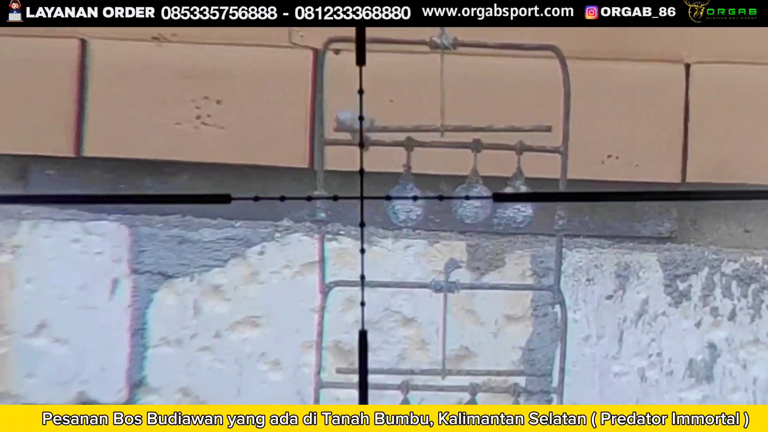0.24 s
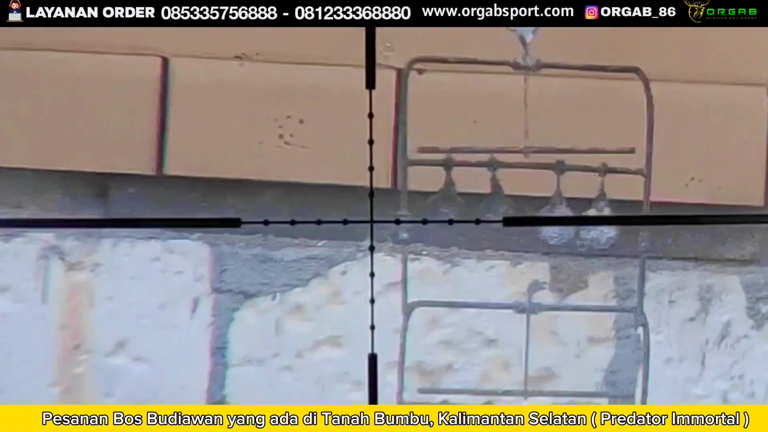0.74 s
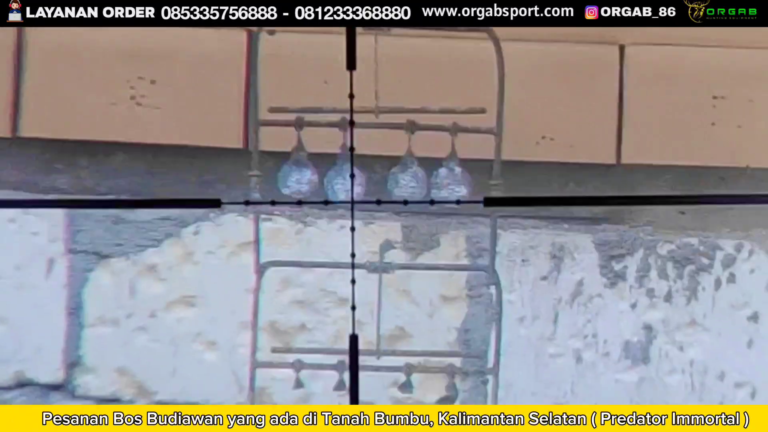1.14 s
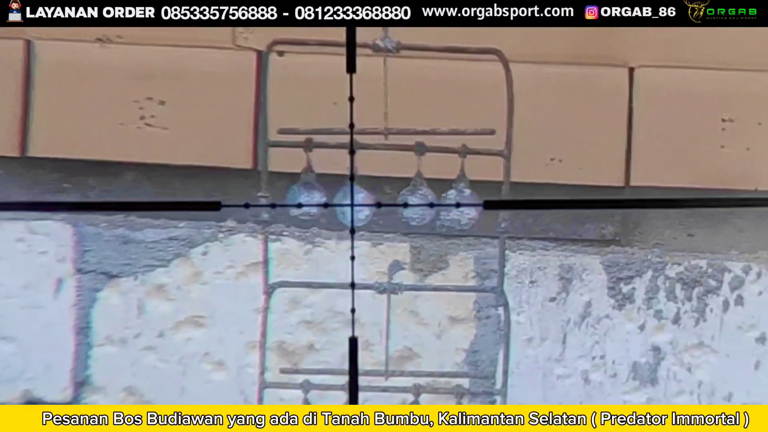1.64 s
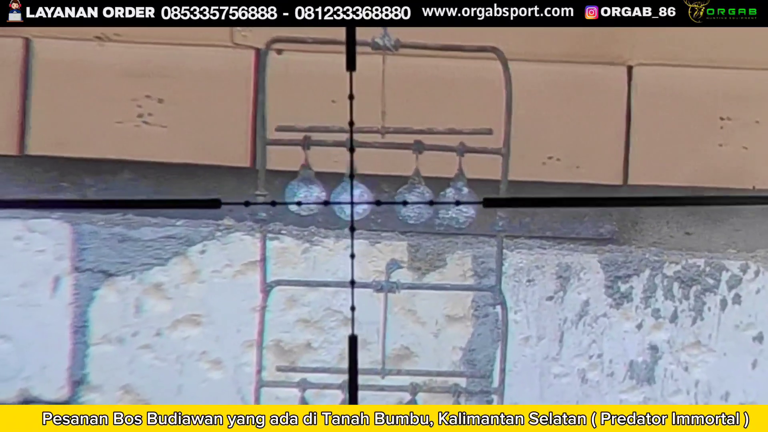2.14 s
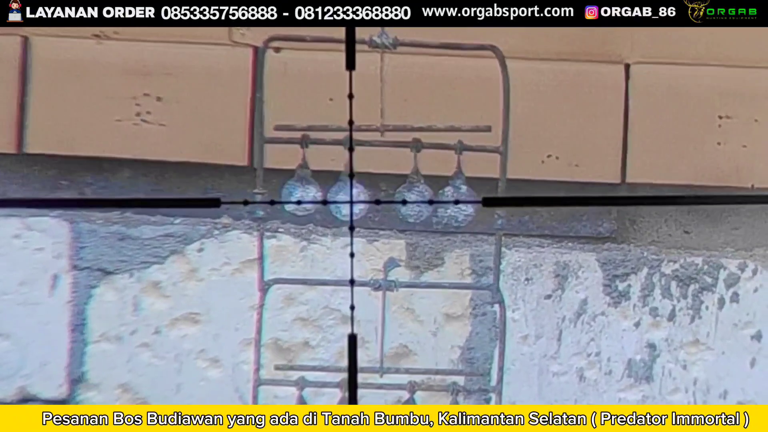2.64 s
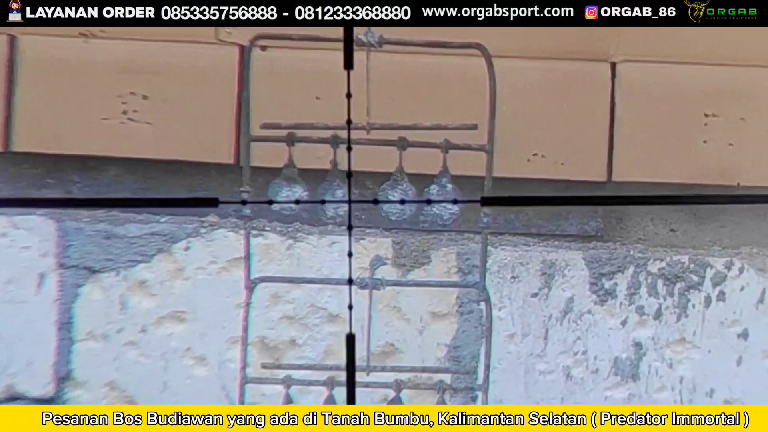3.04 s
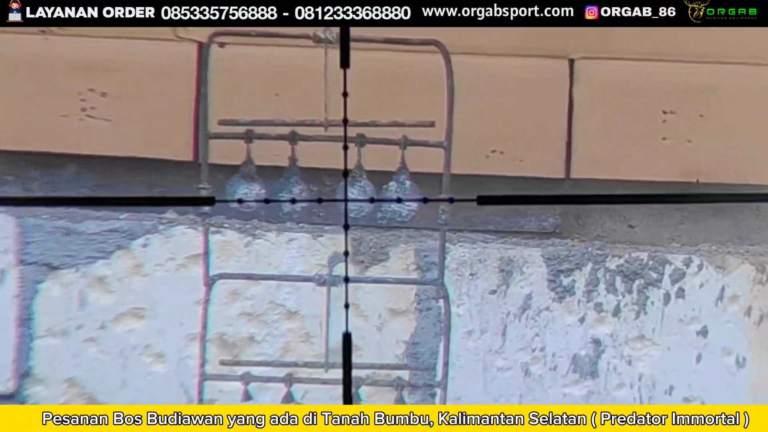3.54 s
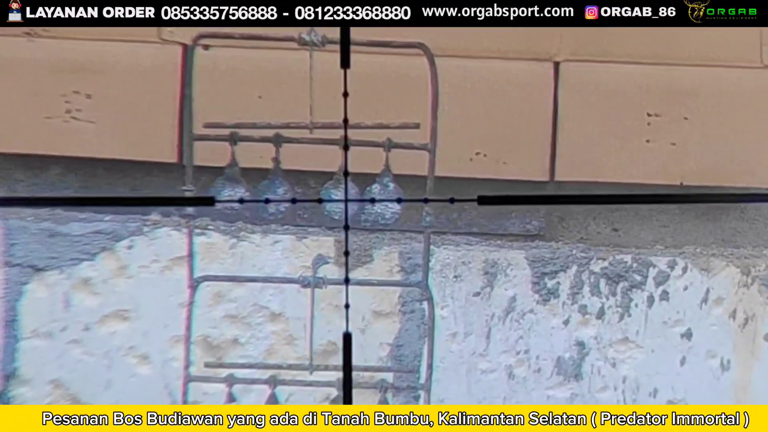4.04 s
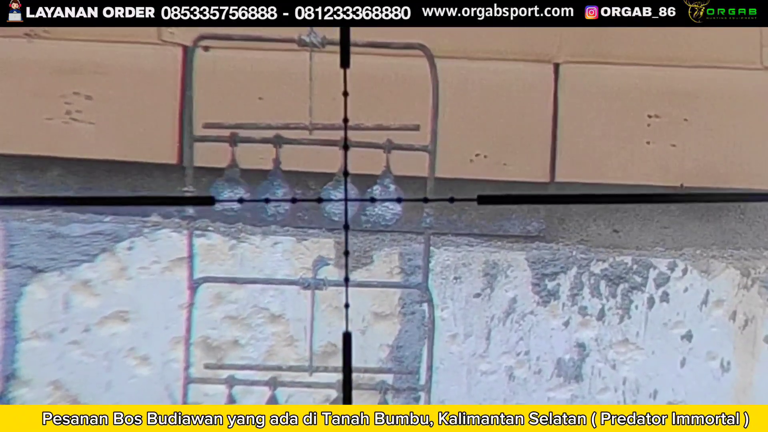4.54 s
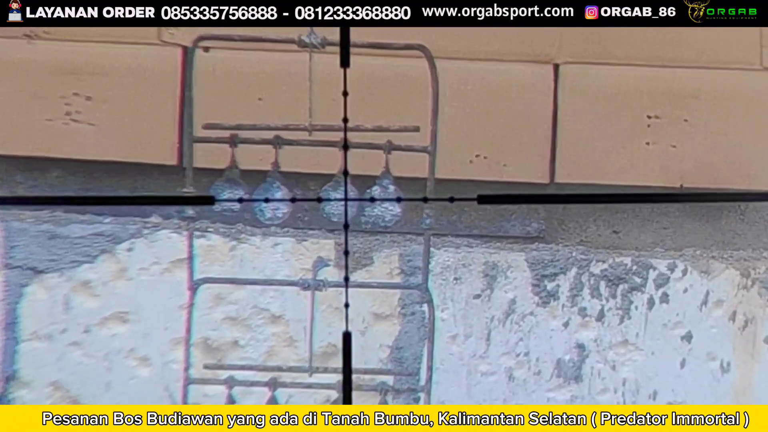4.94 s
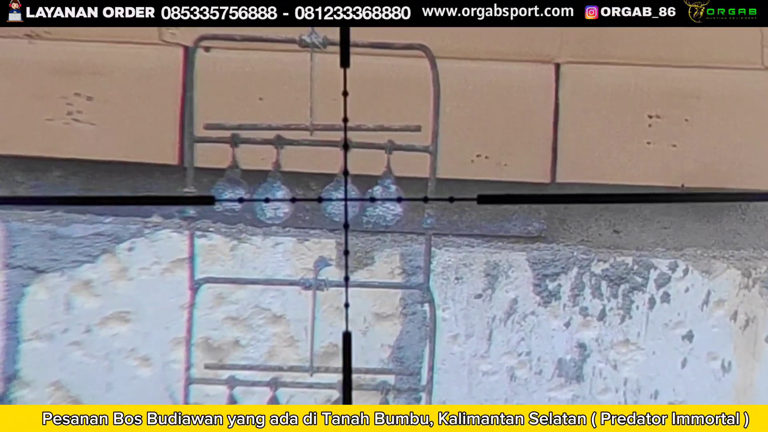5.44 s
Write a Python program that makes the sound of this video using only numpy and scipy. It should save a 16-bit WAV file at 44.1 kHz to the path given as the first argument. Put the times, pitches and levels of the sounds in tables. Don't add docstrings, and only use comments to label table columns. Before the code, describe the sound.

The sound opens in the tail of an air rifle blast: strong bright hiss and a slow pressure bump on the left, holding until about 0.2 seconds and fading dull by 0.5, with a struck steel target ringing to the right. A hard snap cracks at 0.08. From 0.47 to 1.3 seconds the bolt is worked close by: tight clusters of steel clacks around 0.6, 0.74, 0.84, 0.87, 0.98 and 1.1, with woody knocks, springy ringing and brief scrapes, ending in a sharp snap at 1.29 and a little air hiss. Loud clacks overload and duck the background. From 1.5 seconds to the end at about 5.7, a piston compressor chugs nearly seven strokes a second, thumping, puffing, slapping and clanking increasingly brightly over rumble and motor whine, strongest near 4. Small grip creaks at 2, 2.2 and 3.3 to 3.5, soft leaf rustles, and faint belt squeaks from 3.7 to 4.8. Short yard reverberation.

```python
import sys
import numpy as np
from scipy import signal
from scipy.fft import rfft, irfft, next_fast_len
from scipy.io import wavfile
from scipy.ndimage import uniform_filter1d, map_coordinates

SR = 44100
rng = np.random.default_rng(int(sys.argv[2]) if len(sys.argv) > 2 else 0)


def pcm_store(signal):
    levels = np.round(np.clip(np.atleast_2d(signal), -1, 1) * 32767)
    wavfile.write(sys.argv[1], SR, levels.astype(np.int16).T)


def elevation(decibels):
    levels = np.asarray(decibels, float)
    return 10 ** (levels / 20)


N = 250929
T = np.arange(N) / SR
TOP_HZ = 14350
PORT_LAG_S = 18 / SR

# time_s, pressure
PORT_SWAY = [(0, -0.1), (.03, -0.75), (.16, -0.93), (.24, -1.16), (.36, 0.15), (.46, 0.9), (.58, 0.58),
             (.82, 0.053), (1.2, -0.029)]
# freq_hz, level_db_per_hz
AIR_SPECTRUM = [(530, -15), (900, -10), (1290, -12), (1950, -2), (2120, -6), (2770, -3), (7740, -1.5),
                (11200, -9), (14300, -18.5)]
# time_s, left_minus_right_db
RIFLE_PAN = [(0, -3.5), (.25, 1), (.6, 7.5), (.74, 7), (.88, 1.5), (1.0, 5), (1.1, 10.5), (1.22, 9.5),
             (1.29, -9.5)]
# freq_hz, level_db, t60_s
TARGET_MODES = [(229, -2.5, 1.2), (731, 6.5, 1.13), (2003, -27, 1.3), (2470, -2.5, 1.4), (2886, 3.5, 1.17),
                (4011, 2, 0.92), (5030, 6, .3), (5440, -2, .3), (7250, -1, .3), (6980, -5, 0.63),
                (3580, -10, 0.67), (7670, 18, 0.071), (7670, 10, .6)]
# freq_hz, level_db_per_hz
RUMBLE_SPECTRUM = [(12, -3), (22, 0), (32, 2), (48, -3.5), (75, 0.5), (130, -10.5), (211, -14.5),
                   (400, -23), (600, -42)]
# freq_hz, level_db_per_hz
MOTOR_SPECTRUM = [(120, -3.5), (200, -7), (276, -4.5), (369, -8), (459, -2), (614, -5), (978, 1),
                  (1120, -3), (2210, -5), (3140, -13), (3420, -9), (4450, -14), (5070, -6), (5960, -13.5),
                  (6700, -12.5), (8450, -20), (14300, -120)]
# freq_hz, level_db_per_hz
RUSTLE_SPECTRUM = [(1760, -67), (3000, -13), (4430, -11.5), (5050, -2.5), (6000, -11), (12600, -14.5),
                   (14400, -37), (14900, -49), (15400, -77)]
# center_s, half_length_s, height_db
CAMERA_JOLTS = [
    (0, 0.047, 8),
    (.07, 0.023, 7.5),
    (.52, 0.12, 0.5),
    (.87, 0.07, 13.5),
    (1.17, 0.085, 7.5),
    (1.36, 0.11, -1.5),
]
# center_s, half_length_s, height_db
LEAF_GUSTS = [
    (2.45, 0.1, 3.5),
    (3.36, 0.26, 2.5),
    (4.74, 0.13, 5.5),
]
# time_s, load_db
MOTOR_LOAD = [(0, 0), (1.5, -8.5), (2.4, -0.5), (2.75, 1.5), (3.15, 3.5), (3.5, 2.5), (3.9, 7.5), (4.24, 6),
              (4.36, -5), (5.69, -4)]
# freq_hz, width_hz, level_db, growth_db_per_db_load
MOTOR_TONES = [(792, 83, -51, 0.36), (989, 52, -45, 0.45), (1409.5, 32, -47.5, 1.26),
               (5100, 110, -56.5, -0.06)]
# start_s, level_db, decay_ms
LEVER_SNAPS = [
    (.0788, 16, 0.56),
    (0.0808, 5, 1.2),
    (1.2922, -27, 0.73),
    (1.2919, 9, 1.03),
    (1.2945, 5.5, 1),
]
# freq_hz, width_hz, level_db
TUBE_MODES = [(2590, 280, -6), (4200, 290, -2), (5710, 300, -3), (6920, 220, -2.5), (8200, 820, -7),
              (10150, 1040, -2.5), (10580, 320, 1), (13960, 970, -9.5)]
# center_s, half_length_s, level_db
TUBE_REFILLS = [
    (0.054, .008, -40),
    (0.136, 0.037, -21.5),
    (1.3, 0.016, -32),
    (1.357, 0.048, -32.5),
    (1.425, 0.032, -37.5),
]
# peak_s, peak_db, brightness_db, length_ms
BOLT_CONTACTS = [(0.08, -13, 5.5, 1), (0.465, -20, 1, 1.5), (0.4713, -9, 15, 1.2), (0.49, -16, 15, 1),
                 (.485, -18.5, 6, 21), (0.587, -23, -12, 3.4), (0.5916, -11, 18, .8), (.5962, 6, 8.5, 1.52),
                 (.6015, 8.5, 4, 1.2), (.605, 3, -3.5, 2.7), (.738, -1, -4, 2.3), (0.7416, 7, 3.5, 2.2),
                 (0.748, -4, 0, 6), (0.8306, -0.5, 15, 1.5), (.834, 3.5, 17, 2.5), (.837, 3, 11, 2.8),
                 (.772, -9, 14, 5.7), (.846, -1.5, 12, 5.4), (0.863, 1, 12, 1.7), (.8675, 8, 8, 2.5),
                 (.872, 6, 6, 3.3), (0.9758, 2, 11, 4), (1.011, -7.5, -1, 5.2), (1.045, -14, 8, 2),
                 (1.0513, -1, 8, 1.4), (1.0698, -7, 19, .9), (1.092, -16, 7, 4.5),
                 (1.0993, -0.5, -4.5, 1.85), (1.1155, -11, 5, 1), (1.1265, -2, 17, .9),
                 (1.132, -10.5, 10, 2.8), (1.137, -2, -2.5, 2.3), (1.2107, -9.5, -3, 1.5),
                 (1.216, -17, -3, 4), (1.295, -10, -7, 2.2)]
# freq_hz, level_db_per_hz
CLACK_SPECTRUM = [(590, -16), (1000, -8), (3610, 2), (4330, 5.5), (5450, 1), (6470, 4), (7420, 2),
                  (10600, 2.5), (13600, -5.5), (15400, -16.5)]
# freq_hz, width_hz, level_db
STOCK_MODES = [(180, 70, -1), (308, 41, -2.5), (820, 71, -4), (1570, 130, -3), (2420, 490, -8.5)]
# freq_hz, level_db, t60_s
SPRING_MODES = [(6500, -15, 0.081), (10900, 9.5, 0.079), (12400, 2.5, 0.066), (12800, -11, 0.16),
                (12840, 1, 0.054), (13300, -22, 0.3), (13000, 1.5, 0.055), (14300, -21, 0.073)]
# start_s, level_db
SPRING_PLUCKS = [
    (0.47, -25),
    (0.477, -23),
    (0.497, -34),
    (.597, -17),
    (0.739, -39),
    (0.866, -12),
]
# time_s, level_db
BOLT_DRAW = [(.67, -58), (.69, -27), (.713, -27), (.717, -20), (.724, -21), (.728, -19), (.734, -18),
             (.742, -40)]
# start_s, piston_db, valve_db
STROKES = [(1.5078, -22, -36), (1.654, -30, -28.5), (1.8012, -16, -37), (1.9488, -28, -31),
           (2.0977, -17.5, -36), (2.2455, -29, -21.5), (2.39, -12.5, -26.5), (2.5347, -54, -32),
           (2.6772, -22, -25.5), (2.8193, -28.5, -26.5), (2.9629, -23, -22), (3.108, -27.5, -32),
           (3.2518, -17.5, -25), (3.3994, -23.5, -35), (3.547, -20.5, -24), (3.6935, -26, -21),
           (3.8371, -28, -23.5), (3.9809, -26, -17), (4.125, -22.5, -20.5), (4.264, -23.5, -20.5),
           (4.405, -33, -20.5), (4.556, -16.5, -25), (4.705, -51, -27), (4.8581, -16, -24.5),
           (5.0121, -25, -21.5), (5.1599, -15, -22), (5.3073, -35.5, -19), (5.4543, -16.5, -23),
           (5.605, -23.5, -18)]
# lag_s, level_db
FRAME_ROCKS = [
    (-.0025, 0.5),
    (.034, -7.5),
    (.069, -7),
    (.104, -10.5),
]
# start_s, peak_db, t60_s
HAND_CREAKS = [(0.3794, -32, 0.042), (0.7683, -10, 0.069), (1.99, -12.5, 0.024), (2.195, -16.5, 0.23),
               (3.2934, -18, 0.045), (3.364, -17, 0.43), (3.472, -18, 0.3), (4.4443, -24, 0.071),
               (4.7314, -28, 0.05)]
# start_s, freq_hz, level_db, t60_s
KNOCKS_AND_PINGS = [(0.351, 268, -31, .05), (.378, 405, -27.5, 0.13), (.398, 287, -29.5, 0.14),
                    (0.461, 180, -29, .07), (.498, 10950, -26, 0.15), (.603, 837, -0.5, 0.035),
                    (.603, 2530, -10, .03), (.660, 10990, -38, .1), (.835, 2770, -8.5, 0.064),
                    (.868, 301, -13.5, 0.13), (.869, 855, -3, 0.028), (0.871, 178, -14, 0.12),
                    (.977, 807, -18, 0.061), (1.012, 7570, -20, .12), (1.013, 820, -29, .07),
                    (1.045, 7700, -16, .04), (1.068, 824, -23.5, 0.058), (1.070, 289, -32, 0.081),
                    (1.101, 853, -12.5, 0.043), (1.138, 837, -9.5, 0.063), (1.141, 298, -27.5, 0.24),
                    (1.170, 880, -19.5, .07), (1.195, 870, -15.5, 0.035), (1.208, 4440, -18, 0.03),
                    (1.509, 3540, -15, 0.051), (2.090, 494, -38.5, .98), (2.212, 2050, -24.5, 0.13),
                    (2.679, 3650, -30, .08), (3.254, 3520, -19.5, 0.09), (3.255, 4900, -23, 0.027),
                    (3.400, 3510, -20, 0.083), (3.401, 2250, -21.5, 0.059), (3.478, 757, -20.5, 0.14),
                    (3.479, 5140, -27, 0.067), (3.548, 3530, -20.5, 0.095), (3.549, 2330, -28, 0.054),
                    (4.861, 2334, -14, 0.029), (5.200, 3500, -33, .08), (5.16, 5430, -25, .06)]
# start_s, length_s, level_db, brightness_db
STEEL_SLIDES = [
    (0.711, 0.093, -27, 4),
    (0.9, 0.13, -28.5, 6),
    (1.073, 0.13, -27.5, -0.5),
    (1.324, 0.056, -37.5, 5),
    (1.413, 0.052, -55, -3),
]
# freq_hz, width_hz, level_db
VALVE_PLATES = [
    [(1037, 99, -1.5), (1443, 210, 1.5), (1730, 90, 5)],
    [(2023, 130, -2.5), (2397, 183, -2.5)],
]
# start_s, valve_db
PLATE_REBOUNDS = [
    (3.476, -21),
    (3.874, -21.5),
    (4.4528, -31),
    (4.764, -31),
]
UPPER_SEATING_DB = [-4, 3, -5, 0, 0, -2, -2, -1, -6, -2, -0.5, 6, 6, 0, 0, 0.5, -2.5, -4, 1, -4, -0.5, 6, 1,
                    -1, -6, -4, -3.5, 0, -5, -2.5, 4, 3, 8]
# freq_hz, width_hz, level_db
HEAD_MODES = [(2246, 156, 6.5), (3530, 100, 6), (5040, 330, -8.5), (5280, 79, -4), (8050, 280, -15),
              (9500, 400, -11.5)]
# center_s, half_length_s, high_db, low_db
BELT_SQUEAKS = [
    (3.674, .025, -52, -55),
    (3.779, 0.014, -42, -54),
    (4.452, 0.02, -53, -41),
    (4.746, .015, -52, -41),
    (4.798, .02, -50, -39.5),
]
# freq_hz, t60_s
WALL_DECAY = [(200, 0.13), (2000, 0.27), (12000, 0.39)]
# freq_hz, left_minus_right_db
PORT_COLOUR = [(60, -1), (110, 1.5), (200, -1.5), (380, -1.5), (700, -1.5), (1290, 0), (2380, -2.5),
               (4400, -5), (8120, -0.5), (15000, 17.5)]
# freq_hz, coherence
PORT_LIKENESS = [(60, 1), (300, 0.84), (1500, 0.44), (5000, 0.032), (12000, 0.052)]
# start_s, drop_db
GAIN_DUCKS = [(0.079, 18), (0.473, 4), (0.5959, 18), (0.603, 9), (0.742, 18), (0.838, 15.5), (0.870, 13.5),
              (0.981, 10.5), (1.098, 3.5), (1.138, 10.5), (1.2936, 14)]


def unit(x):
    return x / np.sqrt(np.mean(x ** 2) + 1e-20)


def along(points, hz):
    f, v = np.transpose(points)
    return np.interp(np.log(hz + 1), np.log(f + 1), v)


def curves(rows):
    s, *cols = np.transpose(rows)
    return [np.interp(T, s, c) for c in cols]


def humps(rows):
    out = np.zeros(N)
    for s, half_s, height in rows:
        near = slice(max(round((s - 4 * half_s) * SR), 0), round((s + 4 * half_s) * SR))
        out[near] += height * np.exp(-((T[near] - s) / half_s) ** 2)
    return out


def wander(size, rate_hz):
    return map_coordinates(rng.standard_normal(size), [T * rate_hz])


def filtered(x, response):
    m = next_fast_len(x.shape[-1] + 4096)
    return irfft(rfft(x, m) * response(np.fft.rfftfreq(m, 1 / SR)), m)[..., :x.shape[-1]]


def body(modes):
    def response(f):
        total = 0
        for k, (c, w, db) in enumerate(modes):
            total = total + (-1) ** k * elevation(db) * 1j * f * w / (c * c - f * f + 1j * f * w)
        return total
    return response


def tone(hz, width_hz):
    return unit(filtered(rng.standard_normal(N), lambda f: body([(hz, width_hz, 0)])(f) ** 2))


def rush(spectrum, alike=PORT_LIKENESS):
    hz = np.fft.rfftfreq(next_fast_len(N), 1 / SR)
    turn = np.arccos(np.clip(along(alike, hz), -1, 1)) / 2
    z = rng.standard_normal((2, len(hz))) + 1j * rng.standard_normal((2, len(hz)))
    z = z * elevation(along(spectrum, hz)) * (hz < TOP_HZ)
    mid, side = irfft(z * [np.cos(turn), np.sin(turn)])[:, :N]
    return unit(np.array([mid + side, mid - side]))


def patchy(x, depth_db):
    z = signal.stft(x, nperseg=512)[2]
    field = uniform_filter1d(rng.standard_normal(z.shape[1:]), size=4, axis=0)
    field = uniform_filter1d(field, size=12, axis=1)
    y = signal.istft(z * elevation(depth_db * unit(field)), nperseg=512)[1][:, :N]
    return unit(filtered(y, lambda hz: hz < TOP_HZ))


def struck(times_s, levels_db, t60_s, rise_s):
    env, t = np.zeros(N + SR), T[:SR // 5]
    for s, db, t60 in np.broadcast(times_s, levels_db, t60_s):
        env[round(s * SR):][:len(t)] += elevation(db - 60 * t / t60) * (1 - np.exp(-t / rise_s))
    return env[:N]


def ringing(modes, s, db, rough, seconds):
    t, out = T[:round(seconds * SR)], np.zeros(N)
    x = np.zeros(len(t))
    for hz, level_db, t60_s in modes:
        strength = elevation(db + level_db + rng.normal(0, 1.0) - 60 * t / t60_s)
        drift = rough * np.cumsum(rng.standard_normal(len(t)))
        x += strength * np.sin(2 * np.pi * hz * t + drift)
    out[round(s * SR):][:len(t)] = x * np.clip(t / 0.0025, 0, 1)
    return out


def sides(db):
    return np.array([elevation(db / 2), elevation(-db / 2)]).reshape(2, -1)


def tilt(db):
    return lambda hz: elevation(db * np.log2(np.clip(hz, 800, 15000) / 6000) / 2)


def hisser():
    air = rush(AIR_SPECTRUM, alike=[(100, 0.069)])
    top = filtered(air, lambda hz: 1 / (1 + (8000 / (hz + 1)) ** 4))
    return lambda db, bright_db: elevation(db) * (air + (elevation(bright_db) - 1) * top)


def blast():
    hold_s, fade_db_per_s, bright_db, dull_db_per_db = 0.17, 71, 11.5, 0.81
    hiss = hisser()
    lost_db = fade_db_per_s * np.clip(T - hold_s, 0, None)
    level_db = -24.5 + 4 * np.exp(-T / 0.045) + 4 * np.exp(-T / 0.0034) - lost_db
    burst = hiss(level_db, np.clip(bright_db - dull_db_per_db * lost_db, 0, None))
    leak = hiss(-51.5, 2.8) * (T < 1.5)
    return (burst + leak) * sides(curves(RIFLE_PAN)[0])


def target():
    return ringing(TARGET_MODES, 0, -37.0, rough=0.0087, seconds=0.6) * sides(-10.0)


def yard():
    jolt_db = humps(CAMERA_JOLTS)
    rumble_db = -36 + 0.85 * jolt_db - 1.7 * (T < 1.5)
    flutter_db = 1.57 * wander(200, 25)
    motor_db = -37 + 0.24 * curves(MOTOR_LOAD)[0] + 0.74 * jolt_db + flutter_db
    rumble = elevation(rumble_db) * rush(RUMBLE_SPECTRUM, alike=[(30, 0.96), (300, 0.97)])
    motor = elevation(motor_db) * patchy(rush(MOTOR_SPECTRUM), depth_db=2.0)
    rustle = elevation(-47 + humps(LEAF_GUSTS)) * patchy(rush(RUSTLE_SPECTRUM), depth_db=4.0)
    return rumble + motor + np.clip(T - .9, 0, 1) ** 2 * rustle


def motor_whine():
    load_db, = curves(MOTOR_LOAD)
    return sum(elevation(db + grows * load_db) * tone(hz, w) for hz, w, db, grows in MOTOR_TONES)


def lever():
    t = T[:2 * SR]
    snap = np.zeros(len(t))
    for s, db, ms in LEVER_SNAPS:
        snap += elevation(db) * (t > s) * np.exp(-np.clip(t - s, 0, 1) * 1000 / ms)
    ring = elevation(4.5) * filtered(snap * rng.standard_normal((2, len(t))), body(TUBE_MODES))
    narrow = body([(hz, w / 2.5, db) for hz, w, db in TUBE_MODES[:6]])
    sharp = lambda f: narrow(f) / (1 + (f / 7500) ** 3) + 0.078 * (f > 1800) * (f < TOP_HZ)
    swell = humps([(s, w, elevation(db)) for s, w, db in TUBE_REFILLS])[:len(t)]
    hiss = swell * unit(filtered(rng.standard_normal((2, len(t))), sharp))
    return np.pad(ring + hiss, ((0, 0), (0, N - len(t))))


def bolt():
    out, lead = np.zeros((2, N)), 512
    t = T[:4096] - lead / SR
    for s, db, bright_db, ms in BOLT_CONTACTS:
        pan_db = np.interp(s, *np.transpose(RIFLE_PAN))
        knock_db = -15 + (0.81 - 1) * db - 0.53 * (bright_db - 5.0)
        u = (t - [[0], [.0015]]) / (ms / 1000 * np.array([[1], [1.3]]))
        swell = np.exp(-np.clip(np.where(u < 0, u * u, u), 0, 20))
        grain_gain = elevation(4.2 * rng.standard_normal((2, 256)).repeat(16, axis=1))
        grains = swell * grain_gain * rng.standard_normal((2, len(t)))
        parts_db = 2.4 * rng.standard_normal(40)

        def colour(hz):
            ring_db = along(CLACK_SPECTRUM, hz) + np.interp(hz / 450, np.arange(40), parts_db)
            return elevation(ring_db) * tilt(bright_db)(hz)
        steel = filtered(grains, colour)
        steel_scale = 2.7 * np.linalg.norm(steel, axis=1) / np.linalg.norm(swell, axis=1)
        wood = filtered(grains, body(STOCK_MODES))
        hit = steel / steel_scale[:, None] * sides(pan_db) + elevation(knock_db) * wood / np.abs(wood).max()
        out[:, round(s * SR) - lead:][:, :len(t)] += elevation(db) * hit
    return out


def bolt_spring():
    return sum(ringing(SPRING_MODES, s, db, rough=0.11, seconds=.3) for s, db in SPRING_PLUCKS) * sides(10.0)


def frame():
    turn_s, masked_thump_db = 0.15, -37
    s, tick_db, _ = np.transpose(STROKES)
    thump_db = np.append(-29 + 0.42 * (tick_db + 22.5), np.full(9, masked_thump_db))
    s = np.append(s, s[0] - turn_s * np.arange(1, 10))

    def blows(lag_s, db):
        return np.bincount(np.round((s + lag_s) * SR).astype(int), elevation(db), N + SR)[:N]
    rocks = sum(blows(lag_s, thump_db + db + 55) for lag_s, db in FRAME_ROCKS)
    thump = filtered(rocks, lambda f: (body([(78, 48, 0)])(f) / (1 + 1j * f / 150)) ** 2)
    puff_lag_s = .035 + .002 * rng.standard_normal(len(s))
    puff_db = 16 - 8 * (s < 1.4) + 1.14 * rng.standard_normal(len(s))
    intake = filtered(blows(puff_lag_s, puff_db), lambda f: body([(275, 50, 0)])(f) ** 2)
    return thump + intake


def creaks_and_knocks():
    s, db, t60_s = np.transpose(HAND_CREAKS)
    creak = rush([(500, -33), (1500, 4.5), (5000, 3.5), (12000, -1), (15000, -17)])
    knock = np.zeros(N)
    for at_s, hz, level_db, d in KNOCKS_AND_PINGS:
        knock += ringing([(hz, level_db, d)], at_s, 0, rough=0.035 if hz < 1000 else 0.08, seconds=0.3)
    rattle = elevation(1.84 * wander(1000, 150))
    return struck(s, db - 13.0, t60_s, 0.00064) * creak + knock * rattle


def bolt_scrape():
    stick = elevation(2.4 * rng.standard_normal(N // 64 + 1).repeat(64)[:N])
    channel = body([(1580, 720, 2), (2130, 670, 5.5), (2680, 650, 4.5), (4400, 870, -8), (7500, 8900, -14)])
    scrape = unit(filtered(stick * rng.standard_normal((2, N)), channel))
    return elevation(curves(BOLT_DRAW)[0]) * (T < 1) * scrape


def slides():
    rise_db_per_s, fall_db_per_s, pan_widening = 304, 500, 1.4
    hiss, out = hisser(), 0
    for s, length_s, db, bright_db in STEEL_SLIDES:
        before_db = rise_db_per_s * np.clip(s - T, 0, None)
        after_db = fall_db_per_s * np.clip(T - s - length_s, 0, None)
        out = out + hiss(db - before_db - after_db, bright_db)
    catch = elevation(2.3 * wander(3000, 400) - 0.5)
    return out * catch * sides(pan_widening * curves(RIFLE_PAN)[0])


def valves():
    lead_s, t60_s, tightens_s_per_s, upper_db, warm_db_per_s = .0335, 0.088, 0.0082, -1, 3
    out, t = np.zeros((2, N + SR)), T[:4096]
    slaps = [(s - lead_s, db) for s, _, db in STROKES] + PLATE_REBOUNDS
    for (s, db), seat_db in zip(slaps, UPPER_SEATING_DB):
        age_s = s - T.mean()
        high_gain = elevation(upper_db + seat_db + warm_db_per_s * age_s)
        decay = elevation(-60 * t / (t60_s - tightens_s_per_s * age_s))
        puff = decay * (rng.standard_normal(len(t)) + 0.42 * rng.standard_normal((2, len(t))))
        low, high = 1 + 0.031 * rng.standard_normal(2)

        def plates(f):
            both = body(VALVE_PLATES[0])(f * low) - high_gain * body(VALVE_PLATES[1])(f * high)
            return both / (1 + 1j * (f / 2900) ** 5)
        slap = filtered(puff, plates)
        out[:, round(s * SR):][:, :len(t)] += elevation(db + 4.0) * slap / np.abs(slap).max()
    return out[:, :N]


def piston():
    warm_db_per_s = 2
    s, tick_db, _ = np.transpose(STROKES)
    clank_db = -30 + 0.56 * (tick_db + 24.0) + warm_db_per_s * (s - T.mean())
    tick = struck(s, tick_db - 10, 0.068, 0.0012) * rush(RUSTLE_SPECTRUM)
    jolt = struck(s, clank_db + 20, .02, .002) * rng.standard_normal(N)
    return tick + filtered(jolt, body(HEAD_MODES))


def belt():
    high = humps([(s, w, elevation(high_db)) for s, w, high_db, _ in BELT_SQUEAKS])
    low = humps([(s, w, elevation(low_db)) for s, w, _, low_db in BELT_SQUEAKS])
    return high * tone(9900, 79) + low * tone(5450, 79)


def walls(x):
    hz, t, z = signal.stft(rng.standard_normal((2, SR // 2)), SR, nperseg=256)
    decay = elevation(-60 * t / along(WALL_DECAY, hz)[:, None])
    tail = signal.istft(z * decay, SR, nperseg=256)[1]
    late = np.pad(x, ((0, 0), (500, 0)))
    return signal.fftconvolve(late, tail / np.linalg.norm(tail[0]), axes=1)[:, :N]


def scene():
    rifle = lever() + bolt() + bolt_spring() + bolt_scrape()
    machine = motor_whine() + valves() + piston() + belt()
    thumps = frame()
    echo = walls(elevation(-14.5) * rifle + elevation(-5.5) * machine + elevation(-10.5) * thumps)
    air = blast() + target() + slides() + yard() + creaks_and_knocks() + rifle + machine + thumps + echo

    def ports(hz):
        lag = np.exp(-2j * np.pi * hz * PORT_LAG_S)
        return sides(along(PORT_COLOUR, hz)) * [np.ones_like(hz), lag]
    sway = uniform_filter1d(curves(PORT_SWAY + [(1.6, 0)])[0], size=900)
    return filtered(air, ports) + sway * np.array([[1], [0]])


def low_pass(x):
    return signal.sosfilt(signal.butter(12, 15600, fs=SR, output="sos"), x)


def record(dry):
    attack_s, release_s = 0.00037, 0.062
    duck_db = np.zeros(N)
    for s, db in GAIN_DUCKS:
        t = np.clip(T[:2 * SR] - s, 0, None)
        duck_db[:2 * SR] -= db * np.exp(-t / release_s) * (1 - np.exp(-t / attack_s))
    x = dry * elevation(duck_db * np.array([[1], [.45]]))
    x = x / (1 + np.abs(x) ** 8) ** (1 / 8)
    kept = filtered(x, lambda hz: 1 / (1 + (hz / TOP_HZ) ** 120))
    sharp = humps([(s, .004, 1) for s, _ in GAIN_DUCKS])
    mix = kept + elevation(-17) * sharp * (x - kept)
    return low_pass(mix)


dry = scene()
out = record(dry)
pcm_store(out)
```